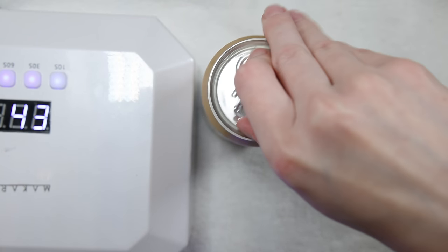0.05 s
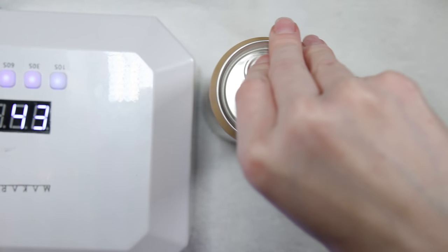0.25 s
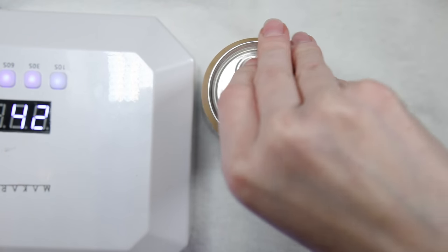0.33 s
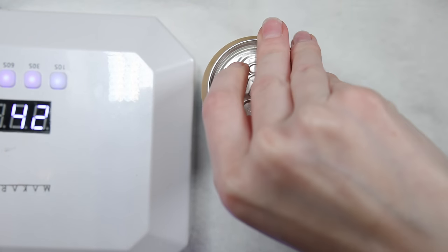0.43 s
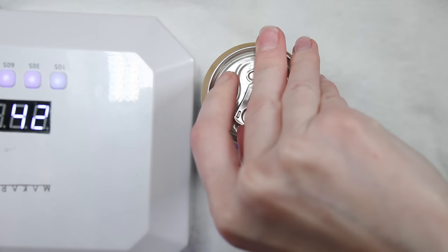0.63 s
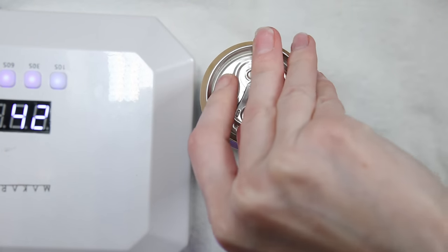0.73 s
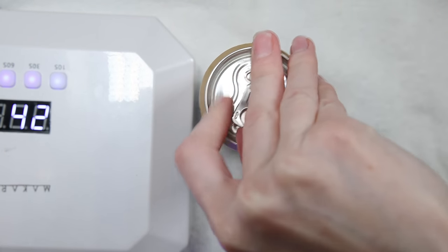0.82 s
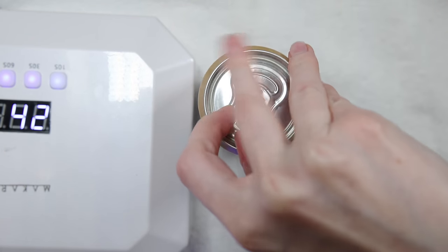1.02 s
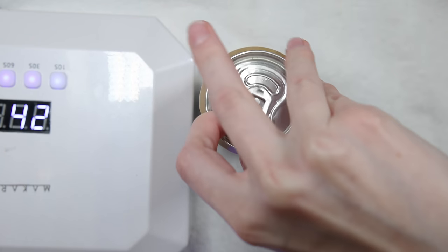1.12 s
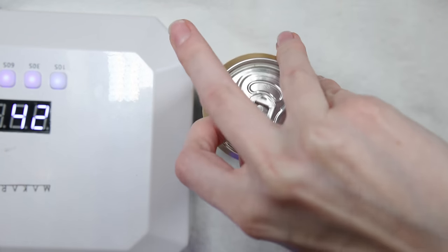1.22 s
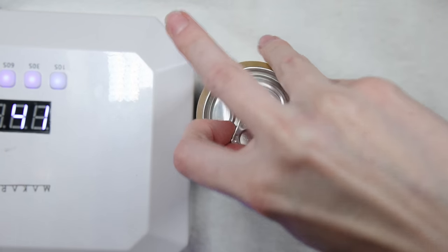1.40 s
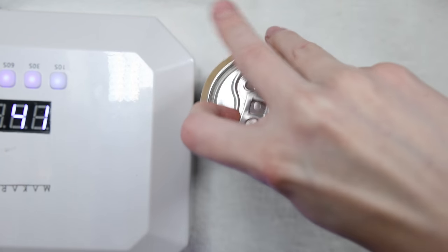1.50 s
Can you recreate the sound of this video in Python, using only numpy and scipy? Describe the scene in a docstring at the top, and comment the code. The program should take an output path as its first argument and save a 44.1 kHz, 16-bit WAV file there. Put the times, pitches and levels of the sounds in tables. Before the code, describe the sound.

A few small metallic clicks as fingernails pick at a drink can's tab.

```python
"""Fingernails pick at the pull tab of a full drink can on a table in a small room.
Each click rings the few strong modes of lid and tab and the many short ones of the thin metal.
Between the clicks nails graze the lid, fingers and can knock softly and skin slides over the can;
near the end a nail slips off with a faint squeak. Low room rumble and mains hum lie underneath."""
import sys
import numpy as np
from scipy import signal
from scipy.fft import irfft
from scipy.io import wavfile

SR = 44100
rng = np.random.default_rng(int(sys.argv[2]) if len(sys.argv) > 2 else 0)


def bounce(signal):
    """Save signal as a 16-bit WAV file at the path given by the first command-line argument."""
    frames = np.transpose(np.atleast_2d(signal))
    limited = np.clip(frames, -1, 1)
    pcm = np.round(limited * 32767).astype(np.int16)
    wavfile.write(sys.argv[1], SR, pcm)


N = 68355
TIME = np.arange(N) / SR
RING_SIZE = SR // 2  # half a second for each touch to ring out
RING_TIME = TIME[:RING_SIZE]


def from_db(db):
    """Decibels to gain."""
    return 10 ** (np.asarray(db) / 20)


def fade(t60):
    """Exponential decay that falls 60 dB in t60 seconds."""
    return np.exp(-np.log(1000) * RING_TIME / t60)


def attack(rise_s):
    """Soft onset that rises from silence towards full level."""
    return 1 - np.exp(-RING_TIME / rise_s)


def add(out, start_s, sound):
    """Mix a sound in at its start time."""
    i = max(int(start_s * SR), 0)
    out[i:i + len(sound)] += sound[:N - i]


def noise(spectrum, size):
    """Noise of rms 1, coloured by a curve of (f/Hz, level/dB) points."""
    hz, db = np.transpose(spectrum)
    bins_hz = np.maximum(np.fft.rfftfreq(size, 1 / SR), 1)
    magnitude = from_db(np.interp(np.log(bins_hz), np.log(hz), db))
    x = irfft(magnitude * np.exp(2j * np.pi * rng.random(len(bins_hz))), size)
    return x / x.std()


def background():
    """Room tone: steady rumble, hiss and mains hum."""
    # spectrum of rumble and hiss: f/Hz, relative level/dB
    air = [(15, -6.5), (28, 4), (38, -7.5), (70, -10), (110, -11.5), (160, -8), (220, -15.5), (400, -20.5),
           (1000, -28.5), (2500, -28), (5000, -30), (10000, -33.5), (16000, -35.5)]
    # steady tones: f/Hz, rms level/dB
    tones = [(28, -67.5), (49.8, -65.5), (150, -75.5), (250, -77), (1013, -78)]
    hum = sum(from_db(db) * np.sqrt(2) * np.sin(2 * np.pi * (hz * TIME + rng.random()))
              for hz, db in tones)
    return from_db(-59) * noise(air, N) + hum


def skin():
    """Fingers slide over the can with a faint friction hiss that swells and recedes."""
    # envelope of the slide: t/s, level/dB
    slide = [(0, -67.5), (0.42, -68.5), (0.52, -64), (0.66, -64), (0.74, -63.5), (0.84, -61), (0.94, -61.5),
             (1.04, -61.5), (1.15, -63.5), (1.28, -68.5), (1.55, -70)]
    # spectrum of skin on metal: f/Hz, relative level/dB
    friction = [(200, 0.5), (600, 1), (1100, 6), (1600, -4), (2400, 3.5), (3200, -5), (4500, -19.5),
                (12000, -18.5)]
    return from_db(np.interp(TIME, *np.transpose(slide))) * noise(friction, N)


def ring(modes, pitch=1, length=1):
    """Struck modes dying away; a resting finger lowers and shortens them by the two ratios."""
    return sum((-1) ** k * from_db(db) * fade(t60 * length) * np.sin(2 * np.pi * hz * pitch * RING_TIME)
               for k, (hz, db, t60) in enumerate(modes))


def can(lid_db, pitch, ring_length, tab_db):
    """The can's answer to one touch: lid and tab modes, a crack and a dense metallic tail."""
    # spectrum of the thin metal's dense, short modes: f/Hz, relative level/dB
    metal = [(350, -37), (700, -16.5), (1200, -11), (1600, -18), (2130, 3.5), (2380, -7), (2780, 9.5),
             (3300, -5.5), (5400, -6.5), (6800, -12), (8500, -10.5), (11000, -16.5), (15500, -30)]
    # modes of the free lid: f/Hz, relative level/dB, t60/s
    lid_modes = [(1253, -43, .19), (1985, -39, .07), (2105, -37, .04), (2226, -25, .10), (2490, -50, .05),
                 (2725, -30, .075), (4660, -52, .12), (4895, -50, .12), (5720, -53, .13), (7610, -48, .10)]
    # modes of the tab: f/Hz, relative level/dB, t60/s
    tab_modes = [(2555, -43, .07), (2802, -36, .115), (2865, -43, .06), (3025, -41, .15), (3175, -48, .13),
                 (3532, -46, .14), (3590, -47, .12), (3820, -46, .12), (4085, -47, .11), (4580, -53, .12),
                 (5318, -48, .14), (5970, -53, .11)]
    lid = from_db(lid_db) * ring(lid_modes, pitch, ring_length)
    tab = from_db(tab_db) * ring(tab_modes)
    crack = from_db(-27.5) * fade(t60=0.034) * noise(metal, RING_SIZE)
    tail = from_db(-36) * fade(t60=0.22) * attack(rise_s=0.003) * noise(metal, RING_SIZE)
    return lid + tab + crack + tail


def contact(x, low_cut_hz, high_cut_hz):
    """Fingers on the lid hold back its low modes; a soft contact misses the high ones."""
    thinned = signal.sosfilt(signal.butter(6, low_cut_hz, "high", fs=SR, output="sos"), x)
    return signal.sosfilt(signal.butter(2, high_cut_hz, "low", fs=SR, output="sos"), thinned)


def grazes():
    """A nail grazes the lid: short swells of tiny slips set the can ringing."""
    # nail strokes: t/s, length/s, gain/dB, low cut/Hz, high cut/Hz,
    # lid gain/dB, lid ring length/ratio, tab gain/dB
    strokes = [(0.030, 0.02, -35, 1200, 3600, -5, 0.94, 3), (0.814, .100, -20.5, 1710, 8100, -15, .5, -10),
               (1.189, 0.044, -33, 1890, 2300, 4, 1.0, -12),
               (1.315, 0.033, -18.5, 955, 2140, -0.5, 0.42, -21),
               (1.383, 0.023, -28, 1730, 2210, 1, .8, -26), (1.401, .030, -24, 990, 2600, 3, 0.86, 5)]
    slips_per_s, spread_db = 1500, 3
    out = np.zeros(N)
    for start_s, length_s, db, low_cut_hz, high_cut_hz, lid_db, ring_length, tab_db in strokes:
        onsets = rng.random(RING_SIZE) < slips_per_s / SR
        strengths = from_db(spread_db * rng.standard_normal(RING_SIZE)) * rng.choice([-1, 1], RING_SIZE)
        swell = np.sqrt(np.abs(np.sin(np.pi * np.minimum(RING_TIME / length_s, 1))))
        slips = onsets * strengths * swell
        body = contact(can(lid_db, 0.97, ring_length, tab_db), low_cut_hz, high_cut_hz)
        add(out, start_s, from_db(db) * signal.fftconvolve(slips / np.linalg.norm(slips), body))
    return out


def thuds():
    """Soft knocks of fingers on the can and of the can on the table, each one damped tone."""
    # knocks: t/s, level/dB, f/Hz, t60/s
    knocks = [(0.043, -40.5, 1473, 0.021), (0.437, -53, 173, .24), (0.438, -47, 123, 0.15),
              (0.606, -48, 144.5, 0.09), (1.110, -39, 1450, 0.019), (1.259, -49, 307, 0.074)]
    out = np.zeros(N)
    for start_s, db, hz, t60 in knocks:
        envelope = from_db(db) * fade(t60) * attack(rise_s=0.0042)
        add(out, start_s, envelope * np.sin(2 * np.pi * hz * RING_TIME))
    return out


def clicks():
    """Single hard touches on the tab ring the can, each with the bright tick of the nail's edge."""
    # picks at the tab: t/s, gain/dB, low cut/Hz, high cut/Hz, lid gain/dB,
    # lid pitch/ratio, lid ring length/ratio, tab gain/dB, tick gain/dB
    picks = [(0.0445, -25.5, 1210, 2960, -1.5, 0.92, 0.54, -5, -11),
             (0.1490, -27, 1950, 3450, -1.5, 0.94, 0.62, -16, -33),
             (0.2015, -1.5, 2180, 6450, -1.5, 0.97, 0.59, 1.5, -11),
             (0.4356, -0.5, 530, 10600, 1.5, 1.0, 0.85, -3, -11),
             (0.6000, -32.5, 1940, 7000, -0.5, 1.0, 0.63, 0, -5),
             (0.8839, -24.5, 1200, 2090, 2, 0.92, 0.45, -15, 16),
             (0.9587, -11, 2910, 4700, -20, 0.6, .6, 3.5, -10)]
    # spectrum of the nail's edge catching: f/Hz, relative level/dB
    nail = [(3000, -22), (5000, -12), (5500, 5.5), (6200, -12), (7200, -3), (8000, -1), (9000, -14.5),
            (12600, -9), (13800, -1), (15000, -15)]
    out = np.zeros(N)
    for start_s, db, low_cut_hz, high_cut_hz, lid_db, pitch, ring_length, tab_db, tick_db in picks:
        tick = from_db(tick_db - 39.5) * fade(t60=0.057) * noise(nail, RING_SIZE)
        body = contact(can(lid_db, pitch, ring_length, tab_db), low_cut_hz, high_cut_hz)
        add(out, start_s, from_db(db) * (body + tick))
    return out


def squeak():
    """A brief, narrow whistle of friction as the nail slides off."""
    start_s, length_s, centre_hz, width_hz = 1.4, 0.034, 5450, 37
    resonance = signal.iirpeak(centre_hz, centre_hz / width_hz, fs=SR)
    whistle = signal.lfilter(*resonance, rng.standard_normal(N))
    swell = np.sin(np.pi * np.clip((TIME - start_s) / length_s, 0, 1))
    return from_db(-60.5) * swell * whistle / whistle.std()


def room(x):
    """The short, diffuse reverb of a small room, wet signal only."""
    wet_db, predelay_s = -13, 0.005
    echoes = rng.standard_normal(RING_SIZE) * fade(t60=0.2) * (RING_TIME > predelay_s)
    return from_db(wet_db) * signal.fftconvolve(x, echoes / np.linalg.norm(echoes))[:N]


def scene():
    """Mono mix: the nail sounds and their reverb over dry knocks, skin hiss and room tone."""
    touches = clicks() + grazes() + squeak()
    return (touches + room(touches) + thuds() + skin() + background())[None]


def record(dry):
    """A steep low-pass takes off the very top of the treble."""
    cutoff_hz = 15850
    return signal.sosfilt(signal.ellip(12, 0.1, 70, cutoff_hz, fs=SR, output="sos"), dry)


dry = scene()
out = record(dry)
bounce(out)
```